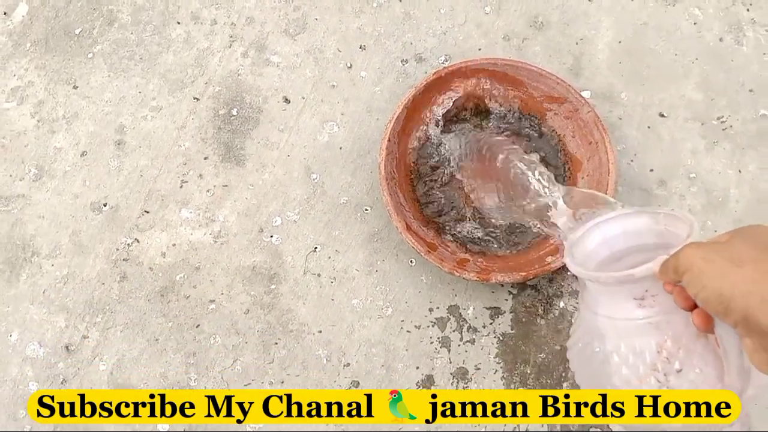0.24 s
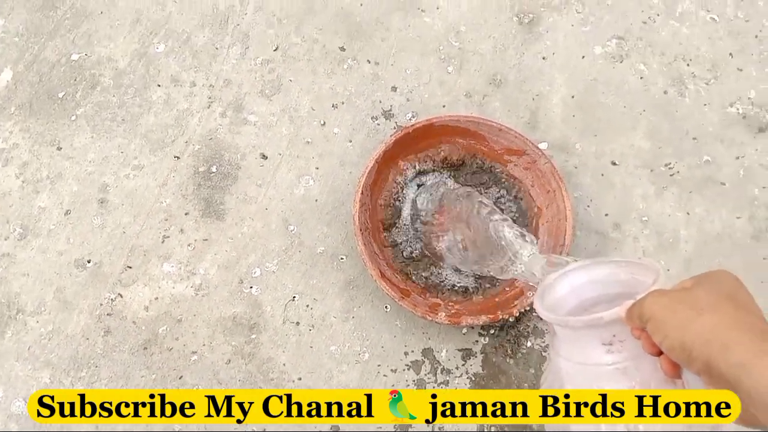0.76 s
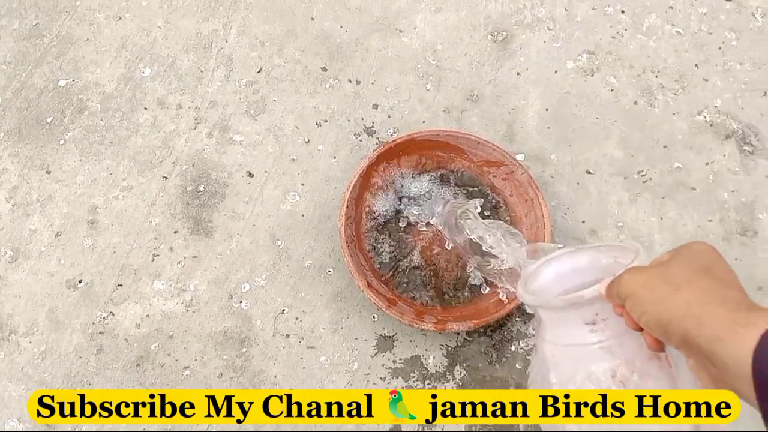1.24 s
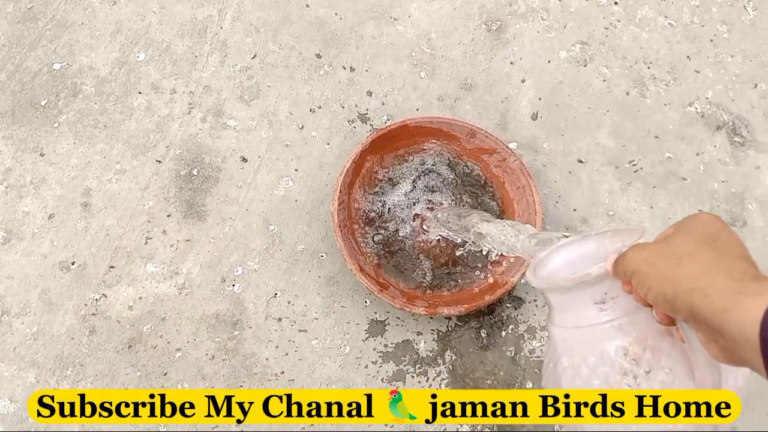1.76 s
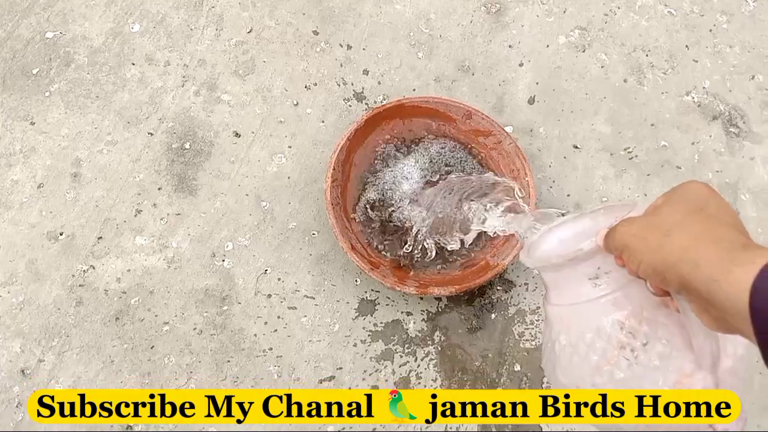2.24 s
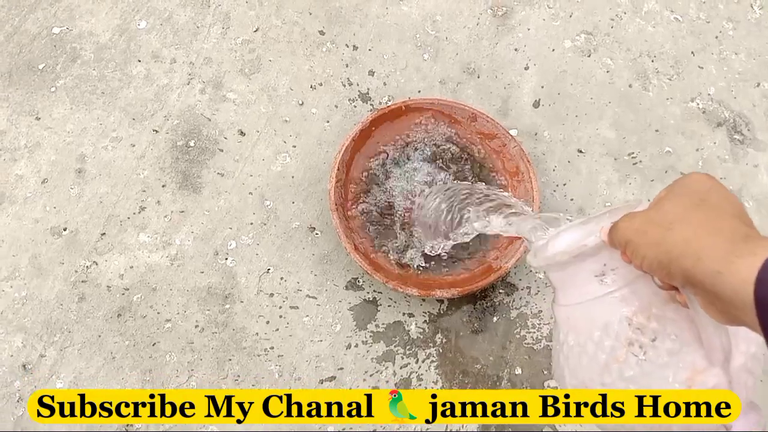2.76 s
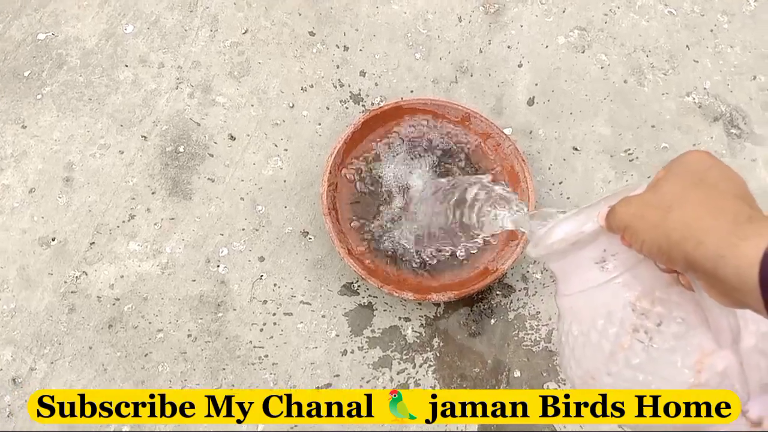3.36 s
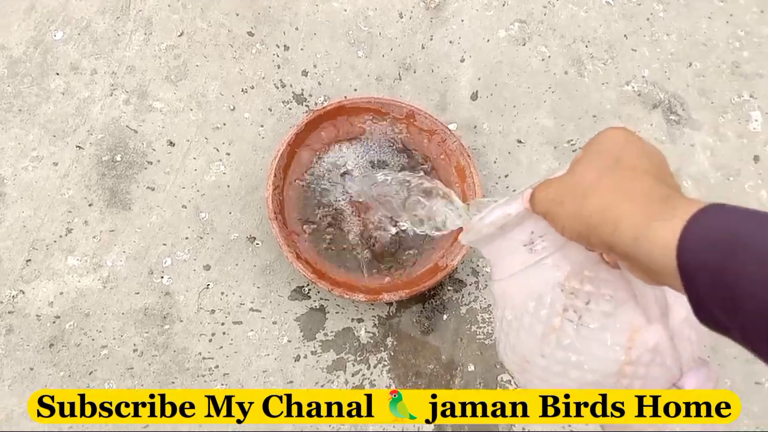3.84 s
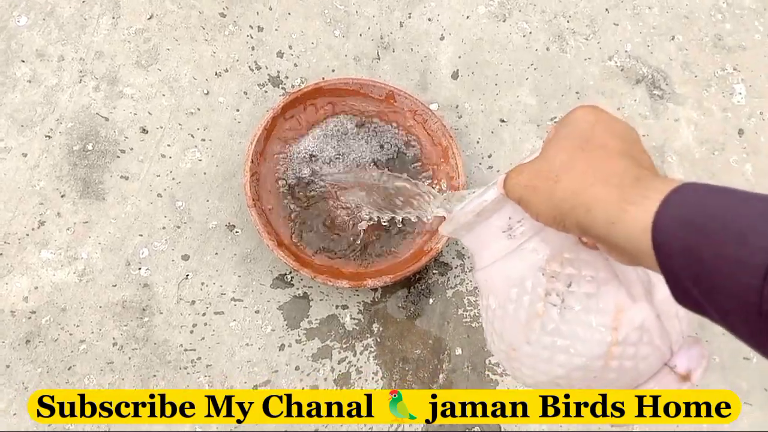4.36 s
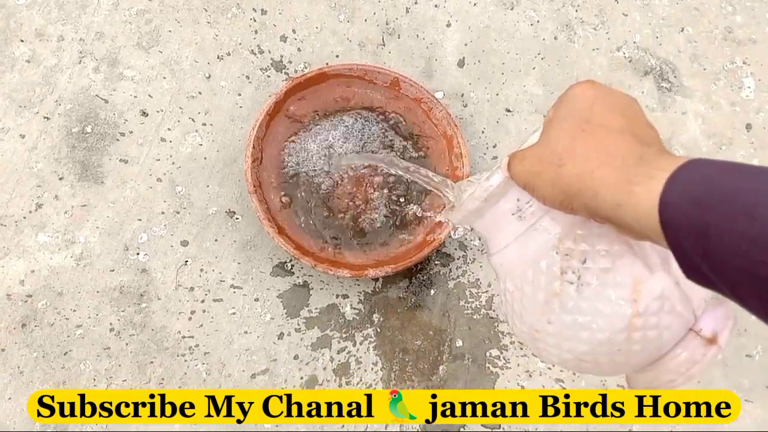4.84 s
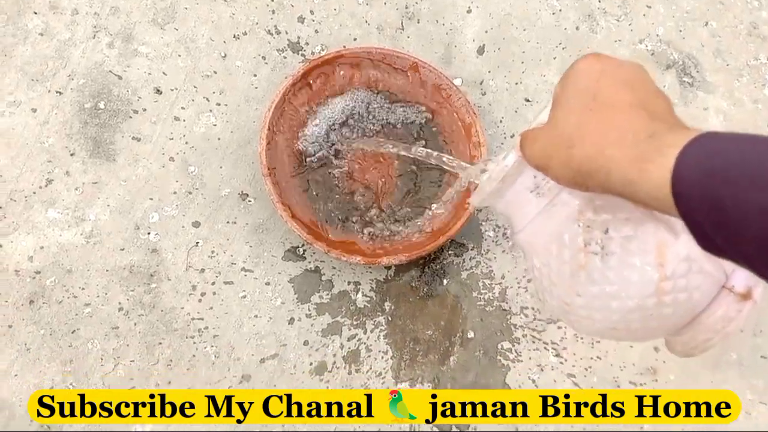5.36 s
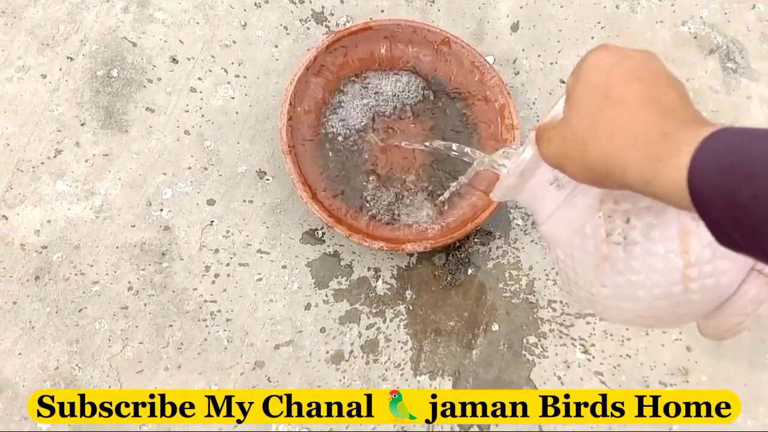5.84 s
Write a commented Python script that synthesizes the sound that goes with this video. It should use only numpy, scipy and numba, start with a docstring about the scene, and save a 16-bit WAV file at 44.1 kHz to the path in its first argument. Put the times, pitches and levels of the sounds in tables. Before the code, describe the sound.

Outdoors, close to a hard floor, water pours from a jug into a shallow clay bowl. From 0 to about 3.4 seconds it is a thick, surging splash: dense mid-pitched bubbling, bright fizz and airy spray, with sharp plops and spattering drops. Low air-pocket gurgles swell, most strongly around 2.8 to 3.7 seconds, while soft wind thumps touch the microphone near 1.7 and 2.4 seconds. Between 3.4 and 3.8 the sheet narrows, ending in a cluster of loud plops. The level then falls sharply to a thin trickle, with small splashes near 4.05, 4.2 and 4.6 and longer-ringing bubbles. After 4.9 it is sparse and quiet: fine ticking droplets, occasional plips, wavering little splashes around 5.2, 5.5 and 5.8, and soft low glugs. A short, scattered reflection and faint outdoor hush remain until about 6.1 seconds.

```python
"""Outdoors on a hard floor, water falls from a jug into a shallow clay bowl: a thick splashing sheet that
thins to a trickle. Crowds of damped sines are the bubbles, and noise adds rush and mist to them.
Large air pockets gurgle low, single bubbles plop, and drops spatter as short noise bursts.
Fine droplets tick through the trickle, and a light breeze buffets the microphone over a faint wavering hush."""
import sys
import numpy as np
from scipy import signal
from scipy.fft import rfft, irfft, next_fast_len
from scipy.io import wavfile
from scipy.ndimage import uniform_filter1d, map_coordinates
from numba import njit

SR = 44100
rng = np.random.default_rng(int(sys.argv[2]) if len(sys.argv) > 2 else 0)


def persist_wave(psi):
    """Save psi, clipped to +-1, as 16-bit WAV."""
    counts = np.round(np.clip(psi, -1, 1) * 32767).astype(np.int16)
    wavfile.write(sys.argv[1], SR, np.atleast_2d(counts).T)


N = 268965  # length in samples

THINNING_S = (3.34, 3.79)  # the sheet narrows to a thread between these times
BANDED_BY_S = 3.76  # by now the fizz has the narrow bands of the filled bowl
CALM_FROM_S = 3.77  # churned water before, calmer water after
NOW_S = np.arange(N) / SR


def amp(db):
    """Decibels to an amplitude factor."""
    return 10 ** (np.asarray(db) / 20)


def unit(x):
    """The signal scaled to an rms of 1."""
    return x / np.sqrt(np.mean(x ** 2) + 1e-20)


def curves(rows):
    """One value per sample for each column after the time."""
    s, *columns = np.transpose(rows)
    return [np.interp(NOW_S, s, column) for column in columns]


def wobble(rate):
    """A smooth random curve through rate knots a second."""
    knots = rng.standard_normal(int(N * rate / SR) + 4)
    return map_coordinates(knots, [np.arange(N) * rate / SR])


def swells(start, held, db, rise, fall):
    """One dB envelope per event (rows), every 64 samples: climbs to its level, holds, falls; slopes in dB/s."""
    since_start = np.arange(0, N, 64) / SR - np.reshape(start, (-1, 1))
    since_hold = since_start - np.reshape(held, (-1, 1))
    return np.reshape(db, (-1, 1)) - rise * np.maximum(-since_start, 0) - fall * np.maximum(since_hold, 0)


def spread(x):
    """Values taken every 64 samples, one per sample."""
    return np.interp(np.arange(N), np.arange(0, N, 64), x)


def filtered(x, response):
    """The signal with its spectrum multiplied by a response of frequency in Hz."""
    m = next_fast_len(N + 8192)
    return irfft(rfft(x, m) * response(np.fft.rfftfreq(m, 1 / SR)), m)[..., :N]


def recoloured(x, spectrum):
    """The signal flattened of its own broad colour, then given a (f/Hz, level/dB) spectrum, at rms 1."""
    m = next_fast_len(N + 8192)
    z = rfft(x, m)
    hz, db = np.transpose(spectrum)
    own_colour = np.sqrt(np.abs(uniform_filter1d(np.abs(z) ** 2, size=1500))) + 1e-9
    log_f = np.log(np.fft.rfftfreq(m, 1 / SR) + 1)
    gain = amp(np.interp(log_f, np.log(hz + 1), db, -120, -120))
    return unit(irfft(z / own_colour * gain, m)[:N])


def patchy(x, depth_db):
    """Foam comes and goes in narrow bands: a random gain in patches of some 300 Hz by 70 ms."""
    z = signal.stft(x, nperseg=256)[2]
    field = uniform_filter1d(rng.standard_normal(z.shape), size=2, axis=0)
    for frames in (22, 8):
        field = uniform_filter1d(field, size=frames, axis=1)
    return signal.istft(z * amp(depth_db * unit(field)), nperseg=256)[1][:N]


@njit
def rings(length, start, step, gain, life, rise, attack):
    """Damped sines: step in radians a sample, life in samples; the pitch climbs by the fraction rise each life."""
    out = np.zeros(length)
    for i in range(len(start)):
        for k in range(min(int(5 * life[i]), length - start[i])):
            u = k / life[i]
            swing = np.sin(step[i] * k * (1 + rise * u / 2))
            out[start[i] + k] += gain[i] * swing * np.exp(-u) * (1 - np.exp(-u / attack))
    return out


def bubbles(count, pitch_hz, octaves, cycles, spread_db, rise, attack):
    """A random crowd of bubbles: log-normal pitch, a life of some cycles, few loud among many soft."""
    when, loud = rng.random((count, 2)).T
    size, ring = rng.standard_normal((count, 2)).T
    start = (when * N).astype(np.int64)
    pitch_hz, octaves, cycles = [np.broadcast_to(v, N)[start] for v in (pitch_hz, octaves, cycles)]
    hz = np.minimum(pitch_hz * 2 ** (octaves * size), SR / 2.5)
    life = cycles * np.exp(0.42 * ring) * SR / hz
    gain = amp(-spread_db * np.log(1 - .985 * loud))
    return unit(rings(N, start, 2 * np.pi * hz / SR, gain, life, rise, attack))


def outdoors():
    """Puffs of wind thump the microphone as low noise over a faint, slightly wavering hush."""
    # puffs of wind: t/s, level/dB
    breeze = [(0.25, -52), (0.36, -54), (1.6, -57), (1.68, -40.5), (1.95, -51), (2.19, -57), (2.43, -43.5),
              (2.49, -50.5), (2.62, -50.5), (2.95, -58), (4.02, -66), (4.14, -58), (4.4, -61), (4.52, -55),
              (5.55, -66), (5.69, -67), (5.851, -59)]
    # colour of wind on the microphone: f/Hz, level/dB
    buffet_spectrum = [(12, -57.5), (20, -4), (58, 2), (75, 12), (140, -3.5), (195, -13), (260, -29),
                       (340, -50), (570, -120)]
    # colour of the distant hush: f/Hz, level/dB
    air_spectrum = [(35, -48), (60, -2), (113, 15), (274, -6.5), (363, 9.5), (607, -37), (1470, 16),
                    (2000, -14), (3340, -21), (6000, -36), (7600, -33), (9600, -35), (10300, -32),
                    (11200, -40), (14600, -40), (16000, -36)]
    air_db, lull_db = -65.5, -81  # the hush before its wobble; the wind between puffs
    s, db = np.transpose(breeze)
    buffet_db = np.maximum(spread(swells(s, 0, db, rise=285, fall=490).max(0)), lull_db)
    puffs = unit(recoloured(rng.standard_normal(N), buffet_spectrum) * amp(2.1 * wobble(30)))
    hush = recoloured(rng.standard_normal(N), air_spectrum) * amp(1.8 * wobble(14))
    return amp(buffet_db) * puffs + amp(air_db) * hush


def drizzle():
    """Stray droplets tick on the pool through the trickle, short and wide in pitch, over a fine wet hiss."""
    # colour of the droplets: f/Hz, level/dB
    droplet_spectrum = [(1500, -17), (3000, 9), (5500, 1.5), (7500, -22), (10300, -13), (13000, -27),
                        (16000, -30)]
    drizzle_db = -74.5  # before its wobble
    ticks = bubbles(count=1400, pitch_hz=4500, octaves=.6, cycles=7.0, spread_db=2.2, rise=0.01, attack=0.15)
    hiss = patchy(rng.standard_normal(N), depth_db=3.0)
    wet = recoloured(ticks + .9 * hiss, droplet_spectrum) * amp(2.5 * wobble(25))
    return amp(drizzle_db) * wet * np.interp(NOW_S, THINNING_S, [0, 1])


def splats():
    """A drop's impact is a short burst of noise: a bright smack with a longer wet body."""
    # drops smacking the surface: t/s, relative smack level/dB, relative body level/dB
    drops = [(0.158, -19, -37), (0.9123, -29, -15), (1.1687, -21, -57.5), (1.7407, -18.5, -6),
             (1.8583, -11, -32), (2.147, -23, -32), (2.2578, -16, -6.5), (2.4123, -14, -9),
             (2.4364, -17, -4), (2.581, -28, -10), (2.618, -18, -10), (2.795, -13, -9), (2.817, -8, -3.5),
             (2.9235, -17, -6), (2.9725, -21, -7), (3.0515, -31, -26), (3.2497, -22, -28),
             (3.452, -18, -29), (3.5396, -18, -41), (3.64, -25, -39), (3.711, -25, -10), (3.746, -27, -42),
             (4.012, -36, -44), (4.036, -38, -19), (4.0914, -31, -36), (4.172, -34, -34), (4.211, -33, -37),
             (4.4097, -34, -45), (4.4301, -30, -45), (4.611, -35, -40), (4.6352, -35, -50),
             (4.6676, -37, -46), (4.889, -52, -36), (5.0208, -47, -33), (5.0577, -34, -56),
             (5.0956, -33, -50), (5.1694, -26.5, -40), (5.3306, -31, -46), (5.361, -38, -50),
             (5.452, -28, -42), (5.522, -25.5, -43), (5.651, -34, -58), (6.069, -24, -52)]
    smack_t60_s, body_t60_s = (0.013, 0.0075), .022  # smack in churned, then calmer water
    dull_from_s, dull_top_hz = 5.2, 11200  # the late smacks are duller
    out, t = np.zeros((2, N + SR)), np.arange(SR // 20) / SR
    for s, smack_db, body_db in drops:
        t60 = [[smack_t60_s[int(s > CALM_FROM_S)]], [body_t60_s]]
        level = amp([[smack_db - 15.5], [body_db - 20.0]])
        burst = rng.standard_normal((2, len(t))) * amp(-60 * t / t60) * level
        out[:, round(s * SR):round(s * SR) + len(t)] += burst
    churned, calm = [signal.sosfilt(signal.butter(3, hz, "high", fs=SR, output="sos"), out[0])[:N]
                     for hz in (10500, 7500)]
    dull = filtered(calm, lambda hz: 1 / (1 + (hz / dull_top_hz) ** 8))
    smack = np.select([NOW_S > dull_from_s, NOW_S > CALM_FROM_S], [dull, calm], churned)
    body = signal.sosfilt(signal.butter(3, [2200, 6500], "band", fs=SR, output="sos"), out[1])
    return smack + body[:N]


def plops():
    """Each bubble pinches off sharply and rings, rising slightly, amid a few softer ones of nearby pitch."""
    # single bubbles that stand out: t/s, strength/dB (before the attack softens it), f/Hz
    main_bubbles = [(0.0416, -14, 2600), (0.048, -14, 1066), (0.121, -13, 1240), (0.179, -12, 1160),
                    (0.245, -14.5, 1340), (0.285, -8.5, 1230), (0.315, -15, 3700), (0.349, -25, 1333),
                    (0.439, -16.5, 1070), (0.527, -18, 795), (0.592, -9.5, 1370), (0.746, -16.5, 1290),
                    (1.04, -16, 1240), (1.095, -14.5, 850), (1.143, -11, 1120), (1.2084, -13.5, 3000),
                    (1.253, -16, 1270), (1.281, -12, 2660), (1.314, -10.5, 1250), (1.386, -11.5, 5600),
                    (1.392, -7, 1125), (1.433, -16, 1070), (1.4578, -6.5, 5340), (1.458, -13, 1140),
                    (1.485, -13, 1420), (1.531, -19, 1350), (1.643, -17, 976), (1.701, -7, 920),
                    (1.738, -18, 896), (1.7507, -10, 2500), (1.763, -8.5, 1295), (1.781, -12, 1430),
                    (1.833, -19.5, 1210), (1.857, -15, 375), (1.923, -15, 1140), (1.9408, -15.5, 2600),
                    (1.9509, -0.5, 1350), (1.9537, -5, 1240), (1.997, -12.5, 3430), (2.033, -13, 1210),
                    (2.164, -24, 1120), (2.191, -25, 1160), (2.2332, -14, 2520), (2.246, -15, 1140),
                    (2.286, -15.5, 880), (2.3463, -16, 2440), (2.4147, -8, 3000), (2.419, -10.5, 1140),
                    (2.474, -10.5, 1470), (2.507, -18, 1290), (2.528, -16.5, 870), (2.6, -10.5, 2470),
                    (2.631, -15, 1200), (2.675, -16, 840), (2.692, -9.5, 1180), (2.739, -13, 1280),
                    (2.763, -11, 1630), (2.818, -16, 4760), (2.915, -16, 1490), (2.922, -15, 3000),
                    (2.94, -11.5, 1120), (2.973, -13, 1600), (2.9744, -8.5, 2880), (3.051, -17, 2500),
                    (3.052, -16, 1550), (3.1612, -16, 2210), (3.167, -12, 1130), (3.226, -16, 1130),
                    (3.357, -17.5, 1230), (3.376, -21, 340), (3.383, -12.5, 940), (3.48, -19, 1570),
                    (3.537, -20, 3200), (3.547, -8.5, 1330), (3.588, -12.5, 1070), (3.5877, -12.5, 2500),
                    (3.588, -20, 401), (3.63, -1.5, 1560), (3.642, -11.5, 5550), (3.641, -7, 1240),
                    (3.641, -15, 3280), (3.643, -14.5, 376), (3.644, -20, 800), (3.657, -16, 1540),
                    (3.663, -17, 910), (3.685, -8, 2710), (3.688, -6, 1840), (3.691, -16.5, 900),
                    (3.702, -12.5, 1280), (3.747, -7.5, 1560), (3.795, -23.5, 1066), (3.799, -28.5, 3530),
                    (3.852, -35.5, 369), (3.87, -28.5, 1171), (3.926, -39, 1610), (3.961, -36, 3300),
                    (3.989, -35, 1505), (4, -42, 3190), (4.028, -32.5, 1610), (4.039, -31.5, 2400),
                    (4.055, -26, 1358), (4.094, -31.5, 1455), (4.108, -35, 378), (4.164, -29.5, 654),
                    (4.167, -36.5, 4750), (4.1987, -35.5, 3580), (4.3, -32.5, 381), (4.365, -31, 3320),
                    (4.4103, -40, 3120), (4.4294, -31.5, 3200), (4.434, -32, 2440), (4.463, -39, 816),
                    (4.486, -37, 506), (4.512, -36, 489), (4.541, -43.5, 3880), (4.548, -37.5, 990),
                    (4.555, -35, 369), (4.582, -34, 1276), (4.589, -33.5, 1690), (4.738, -43, 2860),
                    (4.792, -41.5, 1500), (4.82, -36.5, 1007), (4.831, -47, 4030), (4.833, -37, 883),
                    (4.9401, -49.5, 3270), (5.024, -32.5, 1604), (5.038, -39, 1080), (5.157, -35, 1470),
                    (5.171, -42, 3280), (5.182, -27.5, 335), (5.279, -36, 469), (5.451, -45.5, 6480),
                    (5.3157, -32, 4010), (5.323, -30.5, 468), (5.347, -36.5, 1630), (5.382, -34.5, 476),
                    (5.419, -39.5, 473), (5.467, -39, 355), (5.5347, -46, 4750), (5.7831, -48, 2930),
                    (5.798, -43.5, 3360), (5.707, -53, 3700), (5.877, -30.5, 376.6), (5.857, -49.5, 2740),
                    (5.906, -41.5, 4290), (6.045, -32.5, 1410), (6.061, -36.5, 947), (6.067, -45, 7400)]
    # each pair is for churned, then calmer water
    t60_at_1khz_s, size_law = (0.012, 0.058), (1.15, 0.42)  # higher bubbles ring shorter by this power
    softer_db, scatter_octaves = (17, 13), (.22, .2)  # companions: least drop in level, scatter in pitch
    s, db, hz = np.repeat(np.transpose(main_bubbles)[:, :, None], repeats=8, axis=2)
    calm = (s > CALM_FROM_S).astype(int)
    t60 = np.take(t60_at_1khz_s, calm) * (hz / 1000) ** -np.take(size_law, calm)
    late, detune = rng.random(s.shape), rng.standard_normal(s.shape)
    companion = np.arange(8) > 0  # the first of eight is the main bubble
    s = s + companion * 0.9 * t60 * late
    db = db - companion * (np.take(softer_db, calm) + 6 * late)
    hz = hz * 2 ** (np.take(scatter_octaves, calm) * companion * detune)
    start = (s * SR).astype(np.int64).ravel()
    step = 2 * np.pi * hz.ravel() / SR
    life = t60.ravel() * SR / np.log(1000)
    return rings(N, start, step, amp(db).ravel(), life, 0.0095, 0.68)


def floor_echo(x):
    """The bowl and the hard ground give a short scattered answer: a decaying noise tail."""
    t = np.arange(SR // 6) / SR
    tail = rng.standard_normal(len(t)) * amp(-60 * t / 0.075)  # 60 dB down in 75 ms
    return signal.fftconvolve(np.pad(x, (60, 0)), tail / np.linalg.norm(tail))[:N]


def gurgle():
    """Large pockets of air ring low and long, overlapping one another; the whole pool sloshes lower still."""
    # large air pockets under the stream: t/s, held/s, level/dB (before wobble and bass cut), f/Hz
    air_pockets = [(0.0, .48, -52, 531), (0.93, 0.12, -49.5, 610), (1.4, 0.051, -47.5, 547),
                   (1.74, 0.076, -50, 547), (1.93, 0.19, -49.5, 515), (2.08, 0.11, -45.5, 435),
                   (2.25, 0.24, -51.5, 509), (2.499, 0.16, -50.5, 415.6), (2.78, 0.28, -44.5, 483.5),
                   (3.1, 0.12, -42.5, 435.4), (3.2, 0.13, -42, 421), (3.381, 0.081, -42.5, 393),
                   (3.6, 0.015, -43.5, 402), (3.66, 0.12, -43.5, 408), (3.81, 0.054, -49, 403),
                   (3.95, 0.013, -59, 414), (4.059, 0.075, -53.5, 342), (4.21, 0.01, -61, 408),
                   (4.3, 0.1, -65.5, 376.4), (4.49, 0.023, -54, 480), (4.57, 0.027, -59.5, 440),
                   (4.74, 0.06, -59, 404), (4.97, 0.021, -61.5, 365), (5.04, 0.0077, -59, 339),
                   (5.1, 0.02, -64.5, 389), (5.18, .1, -69, 389), (5.299, 0.1, -57, 473),
                   (5.47, 0.051, -51, 386), (5.53, 0.026, -53, 467), (5.62, 0.027, -60.5, 467),
                   (5.8, 0.089, -57.5, 384), (5.885, 0.078, -49, 370.4)]
    slosh_under_db, slosh_floor_db = 13, -75  # below each gurgle once the bowl is filled; least level
    start, held, db, hz = np.transpose(air_pockets)
    each = swells(start, held, db, rise=390, fall=250)
    level_db, pitch_hz = spread(each.max(0)), spread(hz[each.argmax(0)])  # the loudest sets the pitch
    filled = NOW_S > BANDED_BY_S
    slosh_db = np.maximum(np.where(filled, level_db - slosh_under_db, -120), slosh_floor_db)
    calm = NOW_S > CALM_FROM_S  # in calmer water the pockets agree in pitch and ring longer
    octaves, cycles = np.where(calm, .055, .12), np.where(calm, 11.0, 6.5)
    pockets = bubbles(count=1300, pitch_hz=pitch_hz, octaves=octaves, cycles=cycles,
                      spread_db=0.5, rise=0.0086, attack=0.027)
    slosh = bubbles(count=500, pitch_hz=225, octaves=0.22, cycles=4.0, spread_db=1.5, rise=0.011, attack=0.33)
    pockets = amp(level_db + 1.35 * wobble(21.88)) * pockets
    return filtered(pockets, lambda f: 1 / (1 + (255 / (f + 1)) ** 8)) + amp(slosh_db) * slosh


def stream():
    """The sheet breaks up in surges that shake bubbling, fizz and spray; the thread's fewer bubbles ring longer."""
    # the flow as it thins, level of each layer: t/s, fizz/dB, bubbling/dB, spray/dB
    flow_levels = [(0.0, -41, -36.5, -55.5), (0.44, -42.5, -34, -55), (0.94, -46.5, -40.5, -57),
                   (1.32, -40.5, -36, -50.5), (1.56, -39.5, -34.5, -52.5), (2.15, -41, -35, -51.5),
                   (2.449, -39, -34.5, -51.5), (2.731, -40.5, -36, -53), (3.02, -38.5, -35, -49),
                   (3.4, -44, -36.5, -56), (3.57, -45.5, -41, -55.5), (3.699, -47, -46.5, -57.5),
                   (3.8, -43.5, -37, -50), (3.87, -50.5, -49.5, -60), (3.91, -56.5, -57, -59.5),
                   (4.3, -58, -57.5, -58), (4.95, -75.5, -74, -89), (5.37, -72, -58, -64),
                   (5.7, -78, -64.5, -79), (6.1, -66, -64, -86)]
    # the thread wavers and lands in splashes, levels at the crest: t/s, fizz/dB, bubbling/dB, spray/dB
    splashes = [(4.048, -44, -44.5, -52.5), (4.131, -54, -48, -48), (4.205, -43.5, -43, -53),
                (4.372, -62, -53, -70), (4.445, -54.5, -54, -54), (4.501, -59, -50.5, -64),
                (4.58, -51, -52.5, -56), (4.73, -56.5, -52, -58.5), (4.83, -73, -57.5, -63),
                (4.89, -72, -56.5, -69), (5.025, -69, -56.5, -71), (5.1, -65, -58, -64),
                (5.185, -58, -52.5, -61), (5.32, -58, -63, -58.5), (5.54, -56.5, -60, -70),
                (5.65, -72, -65, -75), (5.8, -59.5, -57, -70), (5.92, -61.5, -58, -70),
                (6.07, -61, -69, -64)]
    # colours of the sheet's bubbling, fizz and spray: f/Hz, level/dB
    bubbling_spectrum = [(320, -101), (550, -15), (700, -6), (881, 2.5), (1010, -1), (1250, 2.5), (1620, 0),
                         (2100, -17), (2730, -15.5), (4620, -120)]
    fizz_spectrum = [(1180, -32), (2000, -8.5), (2540, -1), (3220, -3), (4150, -10.5), (5580, -5.5),
                     (8000, -29.5), (10400, -43), (17600, -120)]
    spray_spectrum = [(4410, -22), (7500, -14.5), (9160, -7.5), (14500, 3.5), (15400, 0), (16000, -7)]
    # colours of the filled bowl's bubbling, the thread's fizz and its mist: f/Hz, level/dB
    pool_spectrum = [(320, -54), (560, -15), (700, -14), (850, -7), (1110, -9), (1550, -1.5), (2020, -19),
                     (2700, -30), (4600, -120)]
    trickle_spectrum = [(1180, 14.5), (2000, -8), (2400, -2.5), (3310, -1), (4510, -9), (6320, -13),
                        (7500, -41), (9750, -63), (16500, -120)]
    mist_spectrum = [(4120, -30), (7000, -15.5), (10300, 3), (11100, -3), (12300, -1), (16000, -3.5)]
    # narrow bands the filled bowl favours: f/Hz, level added to the plain sound/dB
    bowl_bands = [(2450, 1.7), (3300, 2.4), (4900, 4.8), (5800, 2.6), (6500, 3.9)]
    bowl_width_hz = 150  # half-width of each band

    s, *crests = np.transpose(splashes)
    slopes = [(420, 260), (420, 260), (210, 110)]  # rise and fall in dB/s: the spray hangs longer
    fizz_db, bubbling_db, spray_db = [
        np.maximum(flow, spread(swells(s, 0, db, rise, fall).max(0)))
        for flow, db, (rise, fall) in zip(curves(flow_levels), crests, slopes)]
    surge, patter = wobble(16), wobble(70)
    rush = rng.standard_normal((4, N))

    low = bubbles(count=6000, pitch_hz=1192, octaves=0.4534, cycles=4.8, spread_db=2.7, rise=0.031, attack=0.15)
    mid = bubbles(count=7000, pitch_hz=3726, octaves=0.614, cycles=5.0, spread_db=3.3, rise=0.01, attack=0.08)
    top = bubbles(count=9000, pitch_hz=10200, octaves=0.4, cycles=4.2, spread_db=3.0, rise=0.0029, attack=0.068)
    long = bubbles(count=4000, pitch_hz=3914, octaves=.55, cycles=32, spread_db=2.5, rise=0.0043, attack=0.32)
    slow = bubbles(count=1200, pitch_hz=1250, octaves=.45, cycles=7, spread_db=2.5, rise=0.015, attack=0.2)

    # the thick sheet
    bubbling = unit(recoloured(low, bubbling_spectrum) + 0.3 * recoloured(rush[0], bubbling_spectrum))
    fizz = unit(recoloured(mid, fizz_spectrum) + 0.5 * recoloured(rush[1], fizz_spectrum))
    spray = unit(recoloured(top, spray_spectrum) + .5 * recoloured(rush[2], spray_spectrum))

    # the thread
    pool = recoloured(1.2 * slow + bubbling, pool_spectrum)
    thread = recoloured(patchy(1.6 * long + fizz, depth_db=5.0), trickle_spectrum)
    thread = unit(filtered(thread, lambda f: 1 + sum(
        amp(db) / (1 + ((f - hz) / bowl_width_hz) ** 2) for hz, db in bowl_bands)))
    mist = recoloured(patchy(top + 0.62 * rush[3], depth_db=3.0) * amp(1.5 * wobble(200)), mist_spectrum)

    # sine and cosine crossfades from sheet to thread
    thin = np.interp(NOW_S, THINNING_S, [0, np.pi / 2])
    banded = np.interp(NOW_S, (THINNING_S[0], BANDED_BY_S), [0, np.pi / 2])
    bubbling = np.cos(thin) * bubbling + np.sin(thin) * pool
    fizz = np.cos(banded) * fizz + amp(1.5) * np.sin(banded) * thread
    spray = np.cos(thin) * spray + amp(-9.0) * np.sin(thin) * mist

    bubbling = amp(bubbling_db) * unit(patchy(bubbling, depth_db=1.2) * amp(.7 * surge + 1.9 * patter))
    fizz = amp(fizz_db) * fizz * unit(amp(0.67 * surge + 1.75 * patter))
    spray = amp(spray_db) * spray * unit(amp(0.15 * surge + 2.4 * patter + 0.85 * wobble(25.87)))
    return bubbling + fizz + spray


def scene():
    """Stream, gurgles, single bubbles and drops with their echo, drizzle and outdoor air, summed to mono."""
    single = plops() + splats()
    single = single + amp(-8.5) * floor_echo(single)
    single = filtered(single, lambda hz: 1 / (1 + (300 / (hz + 1)) ** 6))  # small sources radiate no bass
    return (stream() + gurgle() + single + drizzle() + outdoors())[None]


def record(dry):
    """The microphone keeps nothing above its band limit."""
    top_hz = 15800
    return filtered(dry, lambda hz: hz < top_hz)


dry = scene()
out = record(dry)
persist_wave(out)
```